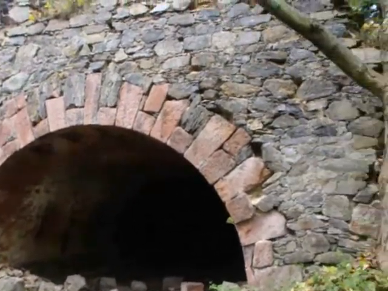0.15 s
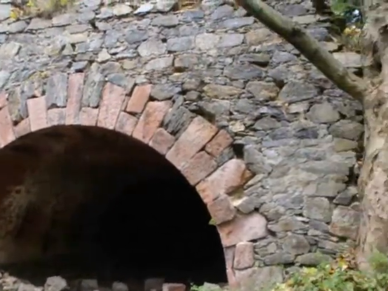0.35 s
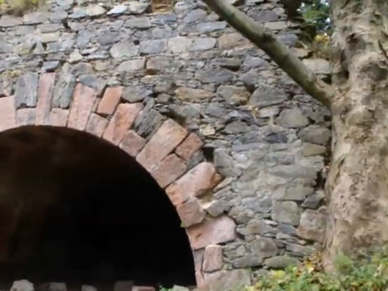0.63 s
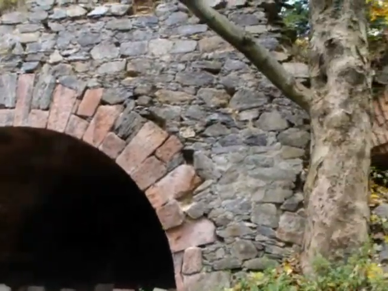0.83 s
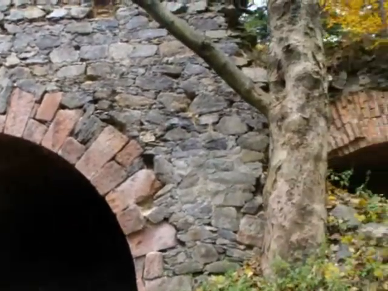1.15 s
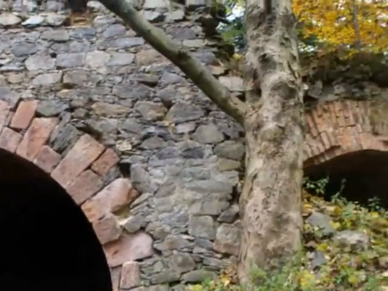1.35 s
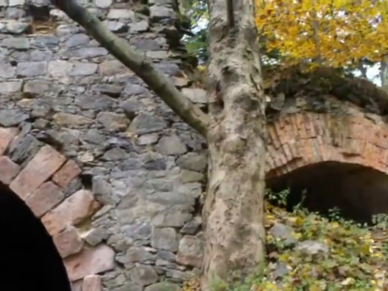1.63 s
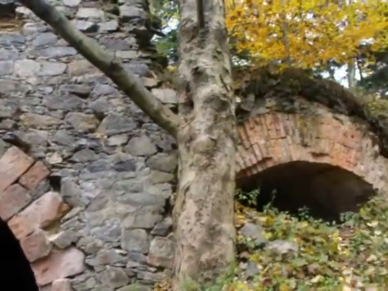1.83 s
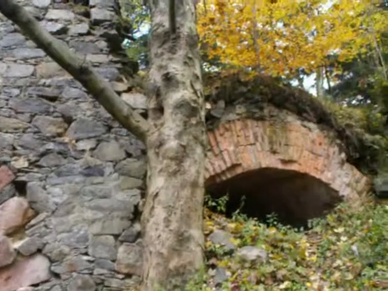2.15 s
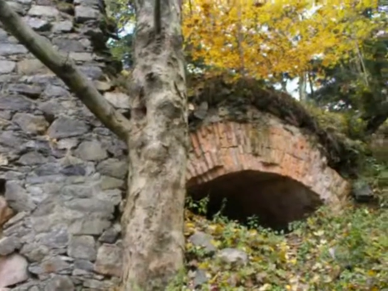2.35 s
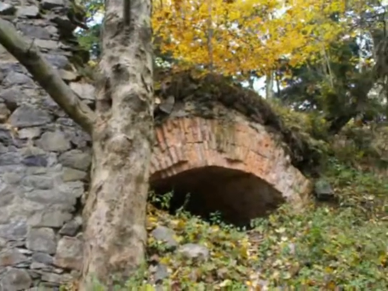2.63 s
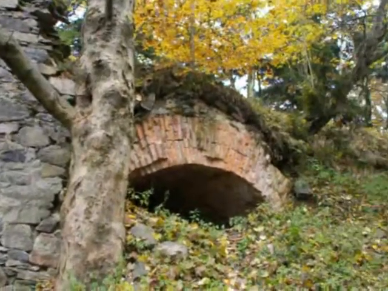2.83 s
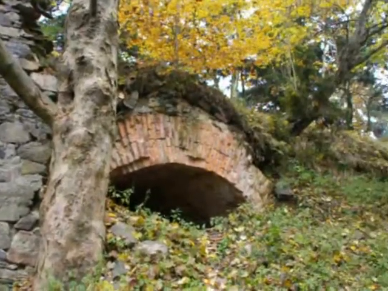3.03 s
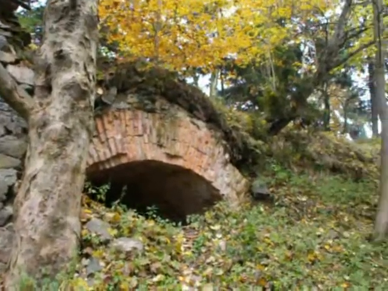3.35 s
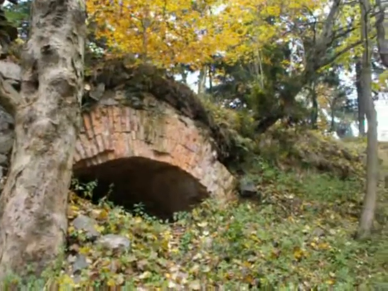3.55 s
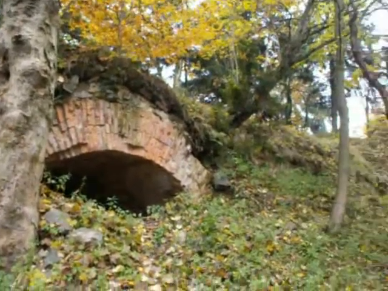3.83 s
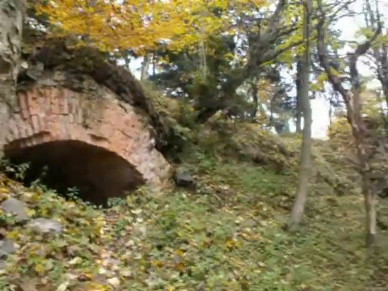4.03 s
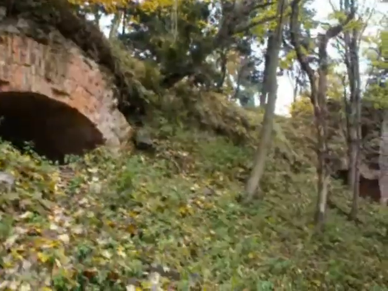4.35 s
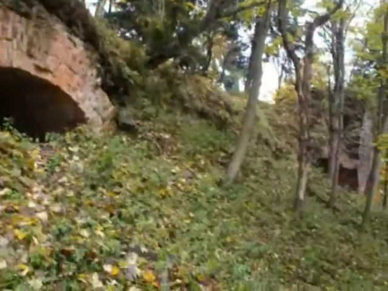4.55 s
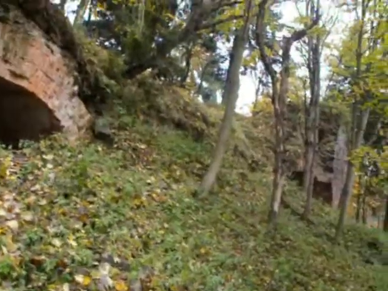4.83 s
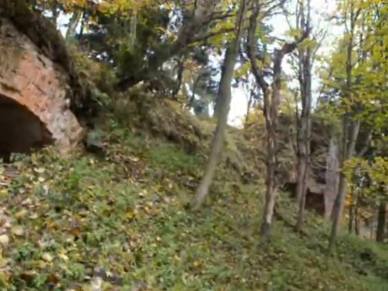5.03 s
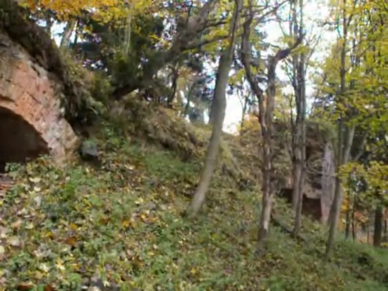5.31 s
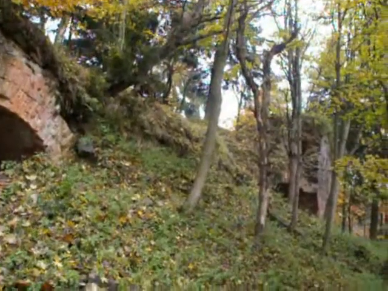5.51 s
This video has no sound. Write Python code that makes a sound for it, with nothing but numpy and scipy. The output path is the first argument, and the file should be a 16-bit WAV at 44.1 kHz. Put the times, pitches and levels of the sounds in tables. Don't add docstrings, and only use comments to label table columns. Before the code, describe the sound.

Slow steps over dry leaves and twigs: sparse snaps, ticks and rustles, then a tight burst of loud cracks, over steady camera hiss and low wind.

```python
import sys
import numpy as np
from scipy import signal
from scipy.fft import rfft, irfft
from scipy.io import wavfile
from scipy.ndimage import uniform_filter1d

SR = 44100
rng = np.random.default_rng(int(sys.argv[2]) if len(sys.argv) > 2 else 0)


def convert_level_to_amplitude(level_db):
    exponent = np.asarray(level_db, float) / 20
    return 10 ** exponent


def to_wav(sig):
    pcm = np.clip(np.atleast_2d(sig), -1, 1) * 32767
    pcm = np.round(pcm).astype(np.int16)
    wavfile.write(sys.argv[1], SR, pcm.T)


N = 250488


def unit(x):
    return x / np.sqrt(np.mean(x ** 2))


def band(x, lo_hz, hi_hz):
    return signal.sosfilt(signal.butter(2, [lo_hz, hi_hz], "bandpass", fs=SR, output="sos"), x)


def noise_band(lo_hz, hi_hz):
    return unit(band(rng.standard_normal(N), lo_hz, hi_hz))


def walk(rate_hz):
    hold = int(SR / rate_hz)
    steps = np.repeat(rng.standard_normal(N // hold + 1), hold)
    smooth = uniform_filter1d(uniform_filter1d(steps, hold), hold)
    return unit(smooth[:N])


def swell_db(start_s, hold_s, db, rise_db_s, fall_db_s):
    t = np.arange(N) / SR - start_s
    rise = rise_db_s * np.minimum(t, 0)
    fall = fall_db_s * np.maximum(t - hold_s, 0)
    return np.maximum(db + rise - fall, -150)


def clicks(rate_hz, spread_db):
    chance, side, size = rng.random((N, 3)).T
    loudness = convert_level_to_amplitude(-spread_db * np.log(1 - size))
    return unit((chance < rate_hz / SR) * np.sign(side - 0.5) * loudness)


def ring(modes, colour_db, length, lag_s, detune):
    hz, db, t60 = np.array(modes).T[:, :, None]
    low_db, hollow_db, splinter_db = colour_db
    group = np.digitize(hz, [650, 1100, 2400])
    db = db + np.array([low_db, hollow_db, 0, splinter_db])[group]
    t = np.arange(SR // 6) / SR
    swell = np.sin(np.pi / 2 * np.minimum(t / (lag_s * 2000 / hz), 1)) ** 2
    turns = hz * detune * t - lag_s * 2000 * np.log(hz / 2000)
    decay = 1000.0 ** (-t / (t60 * length))
    return (convert_level_to_amplitude(db) * swell * decay * np.sin(2 * np.pi * turns)).sum(axis=0)


def snaps(events, modes, lag_s, gain_db, scatter, length=1):
    out = np.zeros(N + SR)
    chance = rng.standard_normal((len(events), len(modes), 1))
    for (s, db, *colour_db), c in zip(events, chance):
        wave = ring(modes, colour_db, length, lag_s, 1 + scatter * c)
        start = int(s * SR)
        out[start:start + len(wave)] += convert_level_to_amplitude(db + gain_db) * wave
    return out[:N]


# (f/Hz, level/dB per Hz)
HISS_SHAPE = [(59, -36.5), (100, -12), (144, -4), (171, -0.5), (413, -2), (483, -2), (526, -0.5),
              (564, -2.5), (744, -1.5), (948, -2.5), (2250, -3), (4820, -4.5), (6250, -18.5), (8120, -68),
              (13800, -120)]
# (f/Hz, level/dB)
WHINE_TONES = [(5012, -52), (6012, -62)]


def camera():
    t = np.arange(N) / SR
    hz = np.fft.rfftfreq(N, 1 / SR) + 1
    shape_hz, shape_db = np.array(HISS_SHAPE).T
    shape = convert_level_to_amplitude(np.interp(np.log(hz), np.log(shape_hz), shape_db, left=-60, right=-90))
    hiss = unit(irfft(rfft(rng.standard_normal(N)) * shape, N)) * convert_level_to_amplitude(-37 + 0.71 * walk(2.92))
    pulse = np.exp(-(t * 59.94 % 1) / 0.12)
    buzz = pulse * noise_band(3200, 4980) * convert_level_to_amplitude(-37)
    whine = sum(convert_level_to_amplitude(db) * np.sin(2 * np.pi * f * t) for f, db in WHINE_TONES)
    return hiss + buzz + whine


# (t/s, hold/s, level/dB)
PUFFS = [(.01, 0.21, -41), (0.37, 0.096, -43), (0.702, 0.026, -44.5), (0.966, 0.25, -41.5),
         (1.3, 0.022, -35.5), (1.43, 0.24, -59), (2.12, 0.036, -38.5), (2.544, 0.037, -42),
         (2.944, 0.035, -44), (3.074, 0.062, -52), (3.347, 0.039, -44.5), (3.558, 0.025, -45),
         (3.967, 0.028, -39.5), (4.293, 0.21, -43), (4.567, 0.11, -34), (4.752, 0.022, -25),
         (4.9, 0.13, -32.5), (5.12, .15, -42.5), (5.39, .04, -34.5), (5.516, 0.12, -27),
         (5.614, .06, -21.5)]


def rumble():
    puffs = [swell_db(*row, rise_db_s=182.5, fall_db_s=132.5) for row in PUFFS]
    wind_db = np.max(puffs, axis=0)
    calm_db, traffic_db = -52.5, -54
    heave = convert_level_to_amplitude(-42.5 + 0.66 * (wind_db + 41.5)) + convert_level_to_amplitude(calm_db)
    deep = noise_band(9, 50.8) * heave * convert_level_to_amplitude(0.32 * walk(17))
    air = rng.standard_normal(N)
    buffet = unit(band(air[::-1], 35, 75)) * convert_level_to_amplitude(-29 + 1.38 * (wind_db + 26))
    flutter = convert_level_to_amplitude(-31.5 + 1.8 * (wind_db + 21)) + convert_level_to_amplitude(traffic_db)
    upper = unit(band(air, 72, 165)) * flutter * convert_level_to_amplitude(1.0 * walk(8.6))
    return deep + buffet + upper


# (t/s, hold/s, level/dB, brightness 0-1)
BRUSHES = [
    (.38, .05, -41.5, 0.3),
    (0.718, 0.048, -38.5, 0.9),
    (1.08, 0.13, -49, .4),
    (1.45, .08, -47, 0),
    (1.583, 0.12, -36.5, 0.1),
    (2.16, 0.14, -41.5, 1),
    (3.315, 0.04, -46, 1),
    (3.46, .015, -46, 0.4),
    (4.596, .08, -47, 0.5),
]


def rustle():
    grains = clicks(6600, spread_db=4.0)
    dull = unit(band(grains, 600, 1800))
    bright = unit(band(grains[::-1], 1800, 4500))
    out = 0
    for s, hold_s, db, share in BRUSHES:
        brush = convert_level_to_amplitude(swell_db(s, hold_s, db, rise_db_s=89, fall_db_s=125.5))
        out = out + brush * (np.sqrt(1 - share) * dull + np.sqrt(share) * bright)
    return out * convert_level_to_amplitude(1.9 * walk(25))


# (t/s, peak level/dB, low/dB, hollow/dB, splinter/dB)
STEM_SNAPS = [
    (0.698, -19.5, -6, -2.5, 0.5),
    (1.952, -6.5, -1.5, 2.5, 0.5),
    (4.057, -29.5, 0, 6.5, 5),
]
# (f/Hz, level/dB, time to fall 60 dB/s)
STEM_TONES = [(300, -8.5, 0.062), (406, -10, 0.17), (610, -34, 0.069), (742, -4.5, 0.085), (919, 1, 0.038),
              (1360, -21.5, .05), (1543, -3.5, 0.051), (1924, -4.5, 0.027), (2300, -26, .03),
              (2700, -9, 0.045), (3100, -15.5, 0.026), (3550, -12.5, 0.025), (4460, -23, .02)]


def hollow_stems():
    return snaps(STEM_SNAPS, STEM_TONES, lag_s=0.00083, gain_db=-6, scatter=0.005, length=0.9)


# (t/s, peak level/dB, low/dB, hollow/dB, splinter/dB)
THICK_SNAPS = [(1.43, -8, 2.5, 4.5, 6), (1.4378, -13, -1, -13, -4), (2.2271, -6, 0.5, 8.5, 6),
               (2.2305, -14, 0, -11, 2), (2.2355, -15, -3, -13, -5), (2.2697, -18.5, 0.5, 4, 4),
               (2.9329, -2.5, 0, 2, 7), (2.9353, -4.5, -14.5, -7.5, -13), (2.9411, -3, -18, 3.5, 3.5),
               (2.9445, -5.5, -22, 1, 0), (3.5794, 4, -2, 4.5, -4), (3.5815, -9, -3, 6, -3.5),
               (3.5853, -2.5, -3.5, -10.5, 1), (3.5925, -4, -10, 6, -10), (4.8308, -16, -9, 8, 6.5),
               (5.1521, -12, -1, -4, 4), (5.2058, -21, -6.5, -16.5, 6), (5.234, -21, -8, -15, -1)]
# (f/Hz, level/dB, time to fall 60 dB/s)
THICK_TONES = [(503.7, -1.5, 0.07), (778, -11.5, 0.032), (946, -8.5, 0.037), (1157, -23, 0.15),
               (1313, -2, 0.013), (1325, -5, 0.024), (1589, -5.5, 0.07), (1695, -13, 0.066),
               (1830, 1.5, 0.024), (1871, -7, 0.036), (2012, -3.5, 0.044), (2285, -5, 0.03),
               (2496, -23.5, 0.096), (3127, -16, 0.043), (3270, -19, 0.039), (3570, -9.5, 0.0082),
               (4010, -16.5, 0.031), (4460, -29.5, 0.01)]


def thick_twigs():
    return snaps(THICK_SNAPS, THICK_TONES, lag_s=0.0014, gain_db=-6, scatter=0.0024)


# (t/s, peak level/dB, low/dB, hollow/dB, splinter/dB)
LEAF_TICKS = [
    (1.5902, -13, 5, 1, 2),
    (1.6402, -14.5, -7, -1.5, -3.5),
    (1.7728, -12.5, -17, 4, -5),
    (1.8356, -16, -14, 10, 0),
    (1.8813, -18.5, -5, 13, -9.5),
    (2.03, -14, 8, -5, -3),
]
# (f/Hz, level/dB, time to fall 60 dB/s)
LEAF_TONES = [(530, -7.5, 0.025), (1025, -6.5, 0.017), (1270, 3.5, 0.021), (2125, -11, 0.0026),
              (2380, 8, 0.017), (3120, 1, 0.01), (4340, -1.5, 0.025), (5300, -6.5, 0.0078),
              (5900, -27.5, 0.014)]


def leaf_ticks():
    return snaps(LEAF_TICKS, LEAF_TONES, lag_s=0.00072, gain_db=-10.5, scatter=0.018, length=0.81)


# (t/s, peak level/dB, low/dB, hollow/dB, splinter/dB)
SPLINTER_SWINGS = [
    (2.2715, -21, 0, 0, 0),
    (2.2825, -26, 0, 0, 0),
    (2.296, -29, 0, 0, 0),
]
# (f/Hz, level/dB, time to fall 60 dB/s)
SPLINTER_TONES = [(1840, -3, 0.096), (3220, -7, .03)]


def sprung_splinter():
    return snaps(SPLINTER_SWINGS, SPLINTER_TONES, lag_s=0.00067, gain_db=0, scatter=0.0037)


# (t/s, peak level/dB, low/dB, hollow/dB, splinter/dB)
STALK_SNAPS = [
    (3.021, -13, 3.5, -1, 0.5),
    (4.0018, -10.5, 3.5, 2, 2.5),
]
# (f/Hz, level/dB, time to fall 60 dB/s)
STALK_TONES = [(510, -8, 0.05), (780, -9, .04), (1017, -7.5, 0.056), (1236, 3.5, 0.018), (1475, -8, 0.048),
               (1850, -4, 0.039), (2220, -2, 0.011), (2580, -13.5, 0.012), (2920, -6.5, 0.023),
               (3560, -14, 0.033), (4160, -16, .02)]


def stalks():
    return snaps(STALK_SNAPS, STALK_TONES, lag_s=0.0013, gain_db=-5.5, scatter=0.0049)


# (t/s, peak level/dB, f/Hz, time to fall 60 dB/s)
HEEL_THUDS = [
    (3.581, -15.5, 132, 0.037),
    (4.908, -21, 71.4, 0.095),
    (5.265, -16.5, 121, 0.027),
]


def thuds():
    t = np.arange(N) / SR
    out = 0
    for s, db, hz, t60 in HEEL_THUDS:
        swing = np.sin(2 * np.pi * hz * np.maximum(t - s, 0))
        out = out - convert_level_to_amplitude(db) * swing * 1000.0 ** (-np.abs(t - s) / t60)
    return out


# (t/s, peak level/dB, low/dB, hollow/dB, splinter/dB)
THIN_SNAPS = [
    (3.947, -12.5, 12, 2.5, 4),
    (4.1277, 7.5, -10, -0.5, 0),
    (4.1305, 4, 3.5, 1, -8.5),
    (4.184, -11, 6, -0.5, -2),
]
# (f/Hz, level/dB, time to fall 60 dB/s)
THIN_TONES = [(327, -17, 0.076), (438, -14.5, 0.099), (811, -6, 0.1), (914, -2, 0.067), (1450, -2.5, 0.031),
              (1580, -13, 0.038), (1865, -7, 0.066), (1950, 12, 0.0067), (2150, -6.5, 0.031),
              (2920, -13.5, 0.016), (3100, -12, 0.029), (3390, -9, 0.022), (4060, -17.5, 0.018),
              (5000, -19.5, 0.025)]


def thin_twigs():
    return snaps(THIN_SNAPS, THIN_TONES, lag_s=0.0015, gain_db=-10.5, scatter=0.0086, length=0.63)


# (t/s, peak level/dB, low/dB, hollow/dB, splinter/dB)
FLAKE_TICKS = [
    (4.2109, -6.5, -1, 1, -3),
    (4.439, -16, -8, 3, -1),
    (4.5019, -18.5, 2.5, 3, 4),
    (4.594, -15.5, -13.5, -5, 4),
    (4.9014, -26, 4, 1, 1),
    (5.0914, -22, 1, 11, -0.5),
    (5.2838, -29, 8, -1, 0),
]
# (f/Hz, level/dB, time to fall 60 dB/s)
FLAKE_TONES = [(550, -16.5, 0.073), (1000, -12, .02), (1410, -4.5, 0.015), (2080, -3.5, 0.018),
               (2660, -1, 0.017), (3400, -5.5, 0.021), (4050, -11.5, 0.012), (4830, -18.5, 0.021),
               (5760, -17.5, 0.01)]


def leaf_flakes():
    return snaps(FLAKE_TICKS, FLAKE_TONES, lag_s=0.001, gain_db=-5.5, scatter=0.026, length=0.81)


# (t/s, hold/s, level/dB, low/dB, hollow/dB)
TWIG_CREAKS = [
    (4.834, 0.011, -24, 1.5, 1),
    (4.864, 0.043, -30.5, -6.5, 6.5),
    (5.01, 0.053, -35.5, 6.5, 2),
    (5.131, 0.032, -26.5, -1, 1.5),
    (5.204, 0.007, -22, -4, -3),
    (5.233, 0.01, -27, -1, 2),
    (5.297, 0.018, -36.5, 2, -4),
]
# (f/Hz, level/dB, time to fall 60 dB/s)
CREAK_TONES = [(521.5, 8, 0.052), (731, -3.5, 0.078), (841, -6.5, 0.064), (1100, -19, 0.019),
               (1430, -4.5, 0.13), (1646, -10, 0.02), (1824, 4, 0.049), (2090, 7.5, 0.023),
               (2570, -8, 0.0096)]


def creak():
    slips = clicks(1500, spread_db=1.5)
    out = 0
    for s, hold_s, db, low_db, hollow_db in TWIG_CREAKS:
        body = ring(CREAK_TONES, (low_db, hollow_db, 0), length=0.7, lag_s=0.0005, detune=0.97)
        body = body / np.sqrt(np.sum(body ** 2))
        push = convert_level_to_amplitude(swell_db(s, hold_s, db, rise_db_s=3996.5, fall_db_s=1300))
        out = out + signal.oaconvolve(slips * push, body)[:N]
    return out


def scene():
    background = camera() + rumble()
    leaves = rustle() + leaf_ticks() + leaf_flakes()
    twigs = thick_twigs() + thin_twigs() + sprung_splinter() + creak()
    plants = hollow_stems() + stalks()
    return (background + leaves + twigs + plants + thuds())[None]


def band_limit(x):
    return signal.sosfilt(signal.butter(12, 6750, fs=SR, output="sos"), x)


def record(dry):
    cut = signal.sosfilt(signal.ellip(6, 0.3, 60, 6900, fs=SR, output="sos"), dry)
    offset = -0.0038
    return band_limit(np.clip(cut + offset, -1, 1))


dry = scene()
out = record(dry)
to_wav(out)
```